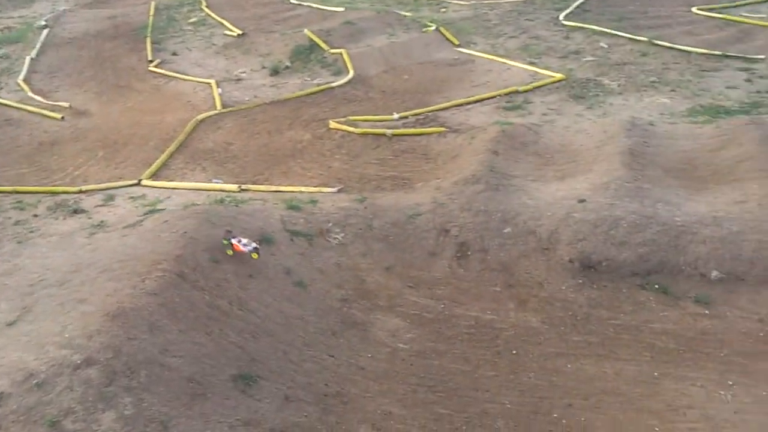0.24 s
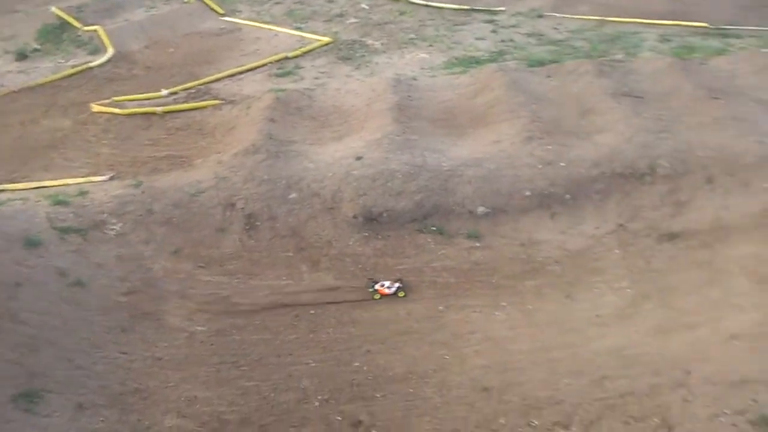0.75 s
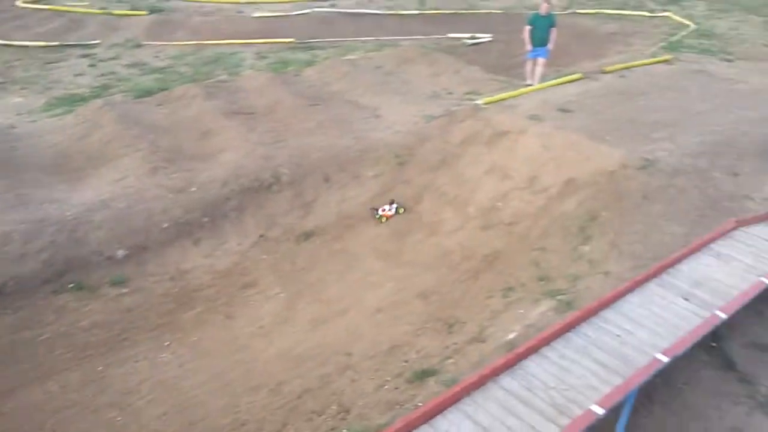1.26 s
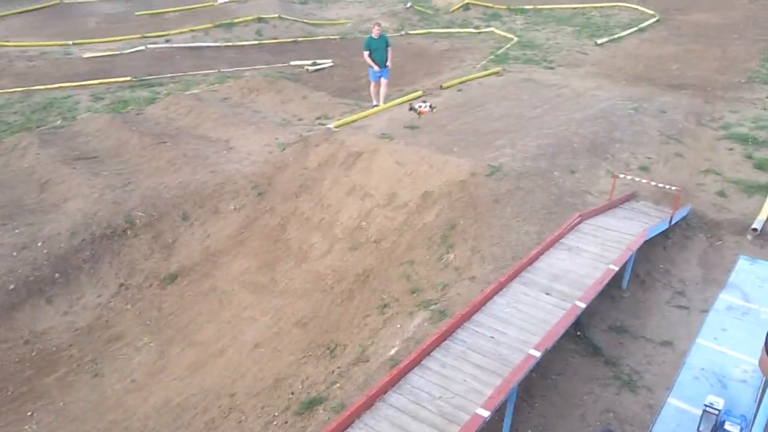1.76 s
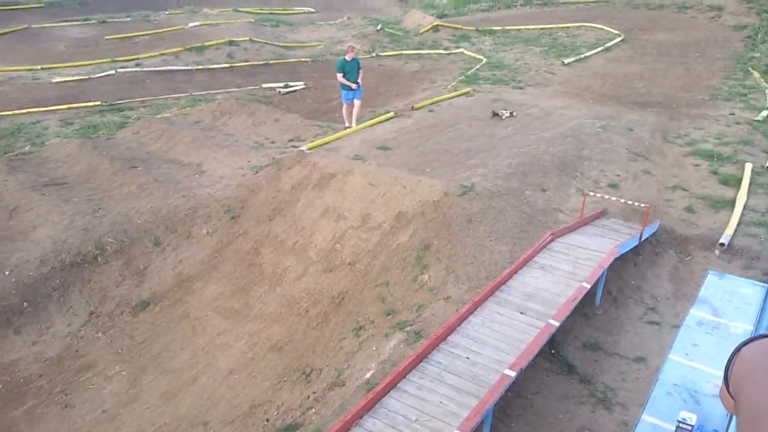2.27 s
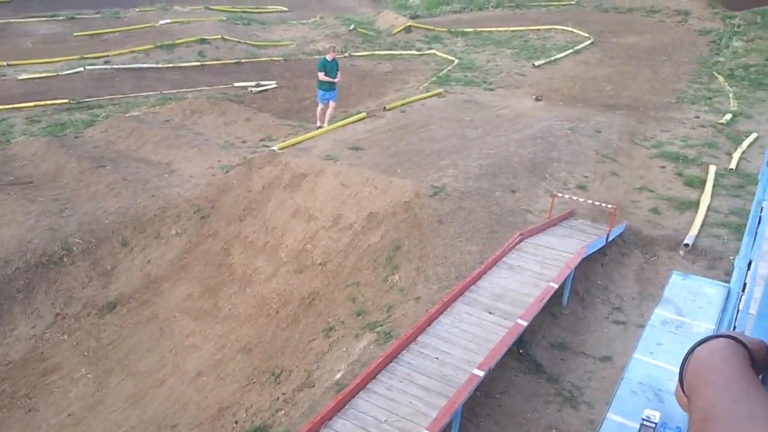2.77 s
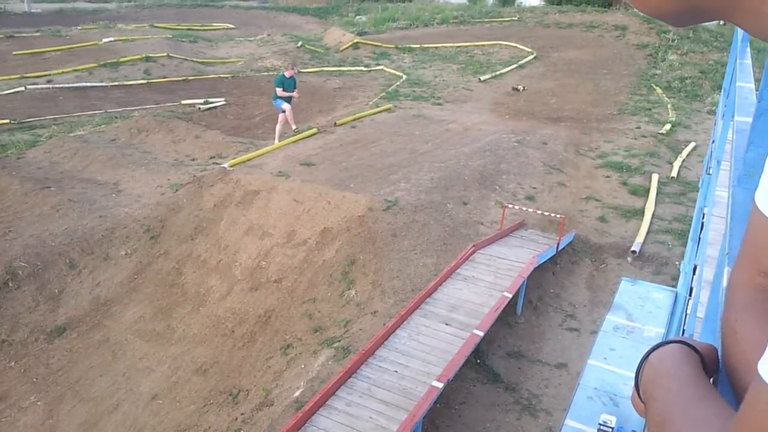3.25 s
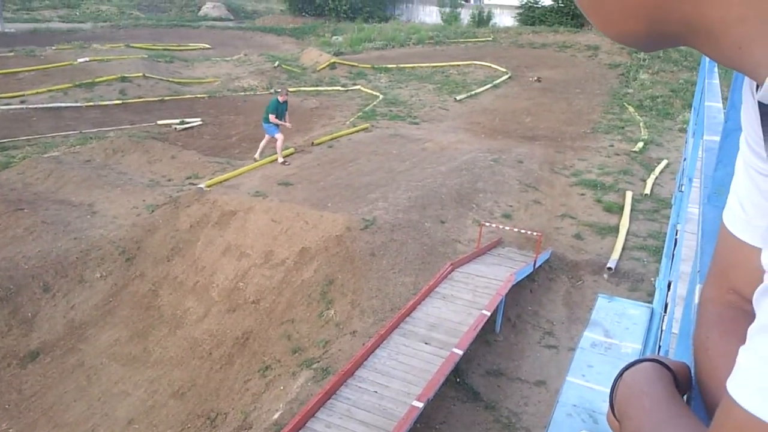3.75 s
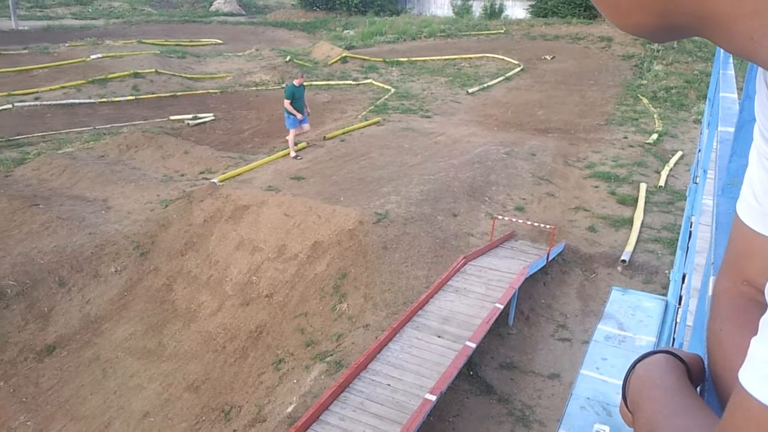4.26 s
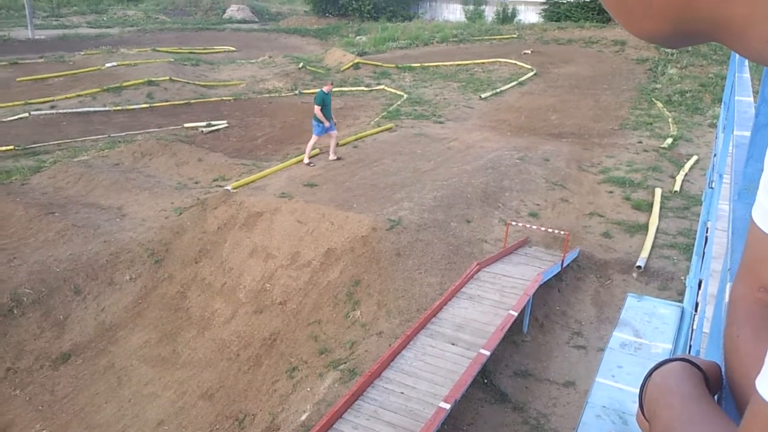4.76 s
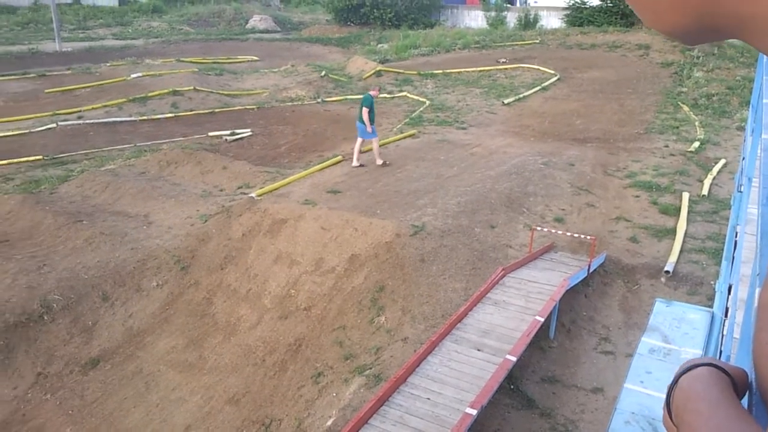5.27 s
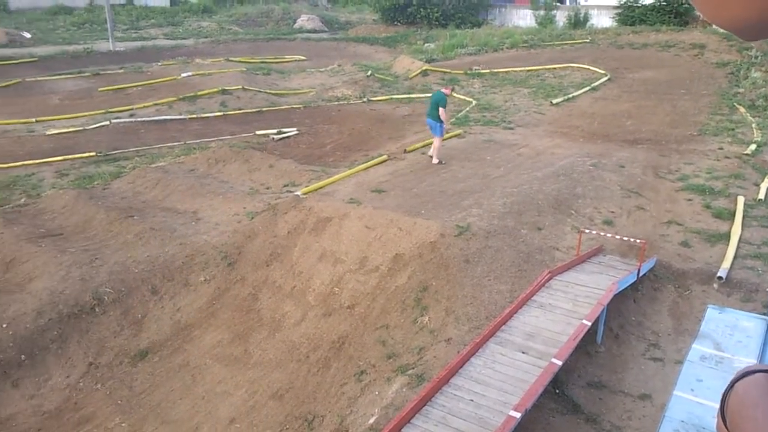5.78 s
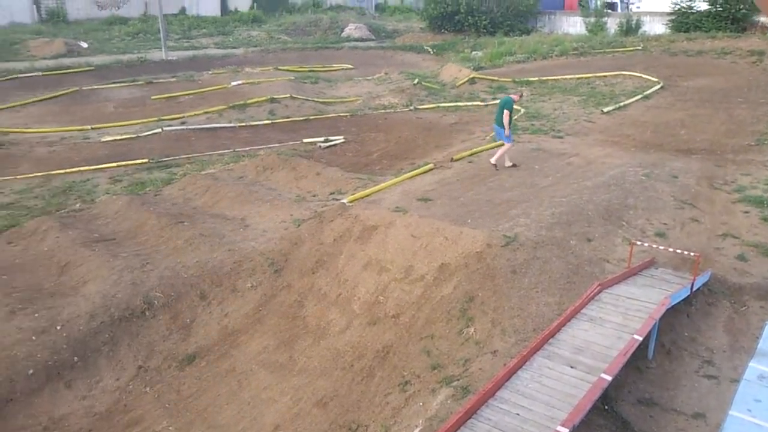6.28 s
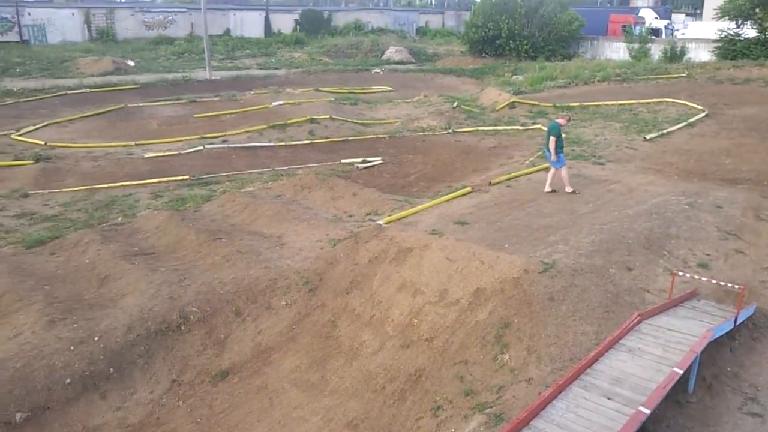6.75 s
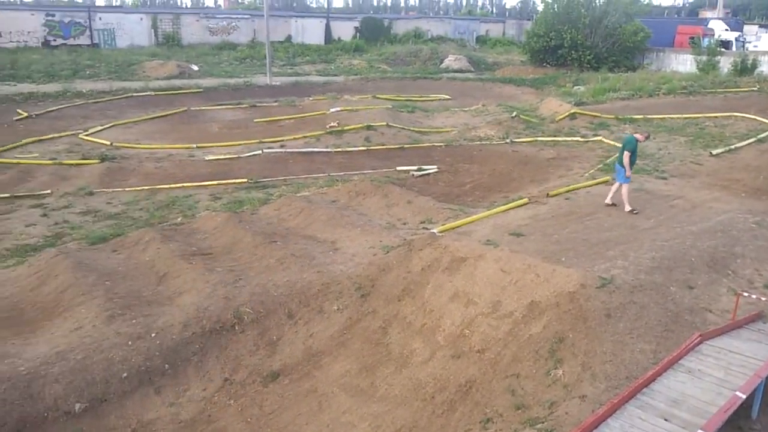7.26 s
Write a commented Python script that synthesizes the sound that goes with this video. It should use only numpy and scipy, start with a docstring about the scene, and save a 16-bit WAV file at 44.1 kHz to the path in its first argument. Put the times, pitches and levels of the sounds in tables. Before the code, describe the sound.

A small fuel-powered model buggy races around an outdoor dirt track. Its two-stroke engine screams in quick, sharp revs with a raspy buzz, a gassy hiss and brief thin whines. Midway it drops to a lower, quieter buzz, then revs up again, stumbling over bumps, with more short blips near the end. The hand-held microphone gives a bright sound with almost no echo.

```python
"""A dirt track: a tiny two-stroke buggy screams round below a hand-held camera, blipped over bumps.
Each firing barks from the tuned pipe, rasps in the crankcase and spits gas; a pure note and short
whines beam out on top, and the dirt banks scatter the engine. The two microphone ports differ:
the left whistles near 10 kHz and overloads, the right is dull and wired inverted."""
import sys
import numpy as np
from scipy import signal
from scipy.fft import rfft, irfft, next_fast_len
from scipy.io import wavfile
from scipy.ndimage import uniform_filter1d, map_coordinates

SR = 44100
rng = np.random.default_rng(int(sys.argv[2]) if len(sys.argv) > 2 else 0)


def dump_mix(stems):
    """Bounce the given channels to the path in sys.argv[1] as a 16-bit WAV at rate SR."""
    frames = np.atleast_2d(stems).T  # one column per channel
    limited = np.clip(frames, -1, 1)  # hard clip at full scale
    pcm = np.round(limited * 32767).astype(np.int16)
    wavfile.write(sys.argv[1], SR, pcm)


N = 331632
TIME_S = np.arange(N) / SR

# Grit, the turbulent share against clean firings, and unsteady revs:
# time_s, bark_share, rasp_share, waver_percent
GRIT = [(0, .08, .35, .5), (.35, .06, .22, .5), (.42, .65, .65, 2), (.6, .35, .55, 1.8), (.75, .2, .4, 1.6),
        (.93, .3, .4, 1.5), (1.02, .8, .35, 1), (1.42, .55, .5, .8), (1.6, .3, .6, 1), (1.72, .75, .3, .25),
        (2, .8, .35, .3), (2.1, .1, .22, .5), (2.24, .15, .3, .5), (2.33, .85, .85, 1), (2.47, .1, .25, 1),
        (2.7, .1, .22, .6), (2.8, .3, .38, 1.6), (3.3, .45, .55, 2), (3.45, .55, .6, 1.3),
        (3.6, .9, .9, .5), (4.9, .85, .85, .8), (5.15, .7, .42, 1.4), (6.1, .8, .55, 1.5),
        (6.25, .5, .45, .4), (6.36, .85, .3, .25), (6.6, .9, .35, .3), (6.75, .92, .7, .8),
        (7.05, .9, .75, .8), (7.12, .55, .5, 1.3), (7.28, .65, .6, 1.5), (7.4, .92, .85, 1)]
def engine():
    """Bark, rasp and hiss ride the same firings; the pure tones come apart, as they beam at the camera."""
    hz = firing_rate()
    bark_grit, rasp_grit, waver_percent = curves(GRIT)
    turns = np.cumsum(hz * (1 + waver_percent / 100 * wobble(45))) / SR
    pulses = firings(hz, turns, scatter_db=1.5, jitter_turns=.005)
    pulses = pipe_smear(pulses, s_per_hz=8e-7)
    bark = pipe_bark(pulses, turns, bark_grit)
    rasp = crankcase_rasp(pulses, turns, rasp_grit)
    hiss = gas_hiss(pulses, turns)
    bark_db, rasp_db, hiss_db = faders()
    # the chassis bounces and swings each outlet about
    body = (amp(bark_db + 1.1 * wobble(25)) * bark
            + amp(rasp_db + .76 * wobble(25)) * rasp
            + amp(hiss_db + .24 * wobble(18) + .97 * wobble(40)) * hiss)
    note = firing_note(turns)
    low_cut_hz = hz * (.92 - .38 * bark_grit)  # the cut sits lower when the bark is gritty
    return moving_eq(body, low_cut_hz), note + whines(turns)


# Moves of the throttle finger: start_s, target_hz, lag_s
THROTTLE_MOVES = [(.015, 575.3, .075), (.17, 509.7, .15), (.385, 431.4, .012), (.44, 375, 0.016),
                  (.52, 434, 0.063), (.64, 558.7, .1), (.75, 498, 0.026), (.94, 340.2, 0.029),
                  (1.05, 268.3, .25), (1.44, 699, 0.23), (1.62, 462.8, .012), (1.66, 255, .25),
                  (2.025, 679.5, .12), (2.2, 597, .015), (2.256, 225.4, 0.049), (2.45, 369.6, .02),
                  (2.54, 589, 0.075), (2.75, 456.6, 0.016), (2.82, 525.6, 0.049), (3.515, 221.7, .1),
                  (4, 332.1, 0.37), (4.17, 351.6, 0.019), (4.39, 230.4, .039), (4.59, 300.5, .04),
                  (4.72, 285.7, 0.052), (5.03, 394.8, .025), (5.2, 473, 0.063), (5.99, 382, 0.011),
                  (6.155, 562.5, 0.042), (6.27, 120.4, .5), (6.65, 238.1, 0.029), (7.08, 403.5, 0.014),
                  (7.19, 450.7, .02), (7.292, 235, 0.054)]
# Wheels dig in and drag the revs down, or lift off and race (negative drop): centre_s, drop_hz
WHEEL_BUMPS = [(.833, 60), (2.967, 105), (3.13, 70), (3.2, 50), (3.275, 62), (3.345, 62), (3.42, -18),
               (3.47, 25.5), (5.408, 55), (5.582, 50), (5.7, -50.5), (5.8, 65), (7.165, 30), (7.254, 46.5)]
def firing_rate(start_hz=268.4, bump_s=.04):
    """Firings a second: the engine chases each throttle setting and stumbles on bumps."""
    hz = np.full(N, start_hz)
    for start_s, target_hz, lag_s in THROTTLE_MOVES:
        a = round(start_s * SR)
        hz[a:] = target_hz + (hz[a] - target_hz) * np.exp(-(TIME_S[a:] - TIME_S[a]) / lag_s)
    return uniform_filter1d(hz, size=600) - bells(WHEEL_BUMPS, bump_s)


def firings(hz, turns, scatter_db, jitter_turns):
    """One sharp pulse a turn, uneven in size and timing."""
    at = np.interp(np.arange(1, turns[-1]), turns, np.arange(N))
    luck = rng.standard_normal((len(at), 2))
    period = SR / hz[at.astype(int)]
    at = np.clip(at + jitter_turns * period * luck[:, 0], 8, N - 9)
    grid = at.astype(int)[:, None] + np.arange(-7, 9)
    offset = grid - at[:, None]
    click = np.sinc(offset) * np.cos(np.pi * offset / 16) ** 2  # lands between samples
    size = amp(scatter_db * luck[:, 1]) * np.sqrt(period)
    return unit(np.bincount(grid.ravel(), (click * size[:, None]).ravel(), N))


def pipe_smear(x, s_per_hz):
    """The pipe's chambers let higher frequencies out later, so a firing is no single click."""
    hz = np.fft.rfftfreq(N, 1 / SR)
    return irfft(rfft(x) * np.exp(-1j * np.pi * s_per_hz * hz ** 2), N)


def puffs(turns, depth):
    """Turbulence that swells once a turn, as the exhaust port opens."""
    return unit(np.exp(depth * np.cos(2 * np.pi * turns)) * rng.standard_normal(N))


# Ring of the tuned pipe: frequency_hz, gain_db
PIPE_RING_EQ = [(150, -30), (330, -26), (570, -19), (790, -4), (930, -4), (1140, -11), (1430, -2),
                (1850, -11), (2350, -3), (2900, -8), (5000, -35)]
# Colour of the pipe's turbulence: frequency_hz, gain_db
PIPE_WASH_EQ = [(150, -11.5), (500, -9), (900, -6), (2300, -5.5), (3200, -29.5)]
def pipe_bark(pulses, turns, grit):
    """Clean firings ring the pipe, and turbulence roughens the bark."""
    ring = unit(coloured(pulses, PIPE_RING_EQ))
    wash = unit(coloured(puffs(turns, depth=.67), PIPE_WASH_EQ))
    return unit(blend(ring, wash, grit))


# Bite of the crankcase: frequency_hz, gain_db
CRANKCASE_EQ = [(1200, -42), (2000, -2), (2800, -2), (3500, 2.5), (4100, 3), (4700, 4), (5400, -2),
                (6000, -5), (8000, -5.5)]
def crankcase_rasp(pulses, turns, grit):
    """Firings and near-steady turbulence buzz through the crankcase."""
    return unit(coloured(blend(pulses, puffs(turns, depth=.027), grit), CRANKCASE_EQ))


# Sizzle of the escaping gas: frequency_hz, gain_db
GAS_EQ = [(3000, -72), (6000, -11), (7300, -5.5), (8600, 1), (10000, 1.5), (12000, -2.5), (15000, -3)]
def gas_hiss(pulses, turns):
    """Gas spits out once a turn, almost all turbulence."""
    return unit(coloured(blend(pulses, puffs(turns, depth=.99), share=.99), GAS_EQ))


# Slow level rides as the buggy moves and turns: time_s, bark_db, rasp_db, hiss_db
LEVEL_RIDES = [(0, -27.5, -15, -43), (.17, -31, -19.5, -18), (.43, -26.5, -14.5, -24),
               (.6, -35.5, -21.5, -20.5), (1, -31, -20.5, -25), (1.6, -33.5, -20, -21.5),
               (2, -30, -16.5, -30), (2.6, -25.5, -22.5, -19), (3.41, -23.5, -17.5, -20),
               (3.95, -33, -30, -37), (4.6, -31.5, -27, -32.5), (4.9, -29.5, -27, -24.5),
               (5.3, -29.5, -26, -20), (6.1, -29.5, -22, -20.5), (6.35, -29, -16, -22.5),
               (6.6, -27.5, -18, -50), (6.8, -30.5, -21.5, -39), (7.05, -29, -22.5, -21.5),
               (7.25, -35.5, -25.5, -20.5), (7.52, -26, -24, -35)]
# Exhaust bursts, mostly as the throttle snaps open: peak_s, hold_s, bark_db, rasp_db, hiss_db
EXHAUST_BURSTS = [(0.06, 0.0051, 5.5, 8, 22.5), (0.389, 0.087, -3, -0.5, 2), (.79, 0.012, 5.5, 2, 0.5),
                  (1.06, 0.0066, 1, 5, -3), (1.2, 0.01, 3, 3, 2), (1.461, 0.028, 7.5, 5.5, 7),
                  (2.054, 0.004, 7, 6, 15), (2.19, 0.0083, -3, -0.5, 12.5), (2.49, 0.0034, 3, 5, 9.5),
                  (4.05, 0.031, 3, 6, -13), (4.208, 0.16, 3.5, 6, 13), (5.085, 0.013, 0.5, 4, 6.5),
                  (5.87, 0.0091, 0, -0.5, 1), (6.22, 0.023, 3.5, 0, 4), (6.69, 0.011, 1.5, 0, 11),
                  (7.105, 0.054, 1.5, 5.5, 6.5), (7.489, 0.01, -4.5, -2, 8.5)]
# Brief ducks in level: centre_s, depth_db
DUCKS = [(.99, 4.5), (2.11, -0.5), (2.641, 4.5), (6.279, 5), (7.308, 6.5)]
def faders(rise_s=.038, fall_s=.054, duck_s=.017):
    """Bark, rasp and hiss in dB: slow rides with bursts and ducks on top."""
    db = np.array(curves(LEVEL_RIDES))
    for peak_s, hold_s, *boost_db in EXHAUST_BURSTS:
        before = np.clip(peak_s - TIME_S, 0, None) / rise_s
        after = np.clip(TIME_S - peak_s - hold_s, 0, None) / fall_s
        db += np.outer(boost_db, np.exp(-before ** 2 - after ** 2))
    return db - bells(DUCKS, duck_s)


# Bands that glint or fade as the buggy turns: centre_s, length_s, centre_hz, width_hz, gain_db
GLINT_BANDS = [(0.2, 0.37, 915, 446, 5), (0.298, 0.7, 3520, 189, 6), (.3, 0.17, 4560, 187, 8),
               (.5, 1.6, 13400, 1500, 4.5), (0.842, 0.36, 2050, 190, 9), (0.946, 0.055, 4260, 349.7, 12.5),
               (1.101, 1.8, 10450, 129.9, 11), (1.38, 0.12, 3500, 150, 8), (1.805, 0.43, 3450, 220, 8.5),
               (2.476, 0.13, 2430, 400, 7), (3.198, 0.31, 895, 129.7, 6.5), (3.847, 0.41, 5350, 299.4, 11),
               (4.229, .12, 5610, 400, 11), (4.286, 0.23, 9655, 399.8, 7), (4.65, 0.64, 5522, 300.1, 10.5),
               (4.94, 0.39, 8600, 191.3, 16), (5.142, 0.4, 4230, 793.4, 6), (5.599, 1.1, 11100, 500.4, 6),
               (6.17, 0.15, 2600, 401.3, 9.5), (6.702, 1.2, 13750, 1530, -9.5),
               (6.86, 0.45, 3880, 250.5, 9.5), (6.918, 0.36, 10040, 200.1, 6),
               (7.097, 0.087, 2280, 700, 6.5)]
def moving_eq(x, low_cut_hz, steepness=12, patchy_db=1.39):
    """The engine's sound with a low cut that follows the firing rate, uneven patches and passing glints."""
    hz, t, spectrum = signal.stft(x, SR, nperseg=1024)
    hz = hz[:, None]
    patches = uniform_filter1d(rng.standard_normal(spectrum.shape), size=8, axis=0)
    db = patchy_db * unit(uniform_filter1d(patches, size=4, axis=1))
    for centre_s, length_s, centre_hz, width_hz, gain_db in GLINT_BANDS:
        band = np.exp(-((hz - centre_hz) / width_hz) ** 2)
        db += gain_db * band * soft_gate(t, centre_s, length_s)
    ratio = hz / np.interp(t, TIME_S, low_cut_hz)
    low_cut = 1 / (1 + (ratio + 1e-3) ** -steepness)
    return signal.istft(spectrum * amp(db) * low_cut, SR, nperseg=1024)[1][:N]


# Level ride of the engine's fundamental: time_s, level_db
NOTE_RIDE = [(0, -40), (.14, -38), (.9, -35.5), (1.1, -40.5), (1.4, -42), (1.6, -36), (1.8, -62),
             (2.2, -21.5), (2.35, -49), (2.68, -29), (2.85, -48), (3.5, -49), (3.75, -44), (4.1, -40.5),
             (4.3, -25.5), (4.5, -40), (4.9, -35), (6.25, -33), (6.6, -57), (7.52, -47)]
def firing_note(turns):
    """A pure note at the firing rate, fluttering in level and phase."""
    level_db = curves(NOTE_RIDE)[0] + 2.5 * wobble(40)
    return amp(level_db) * np.sin(2 * np.pi * turns + .4 * wobble(70))


# Overtones that cut through: centre_s, length_s, harmonic_number, level_db
WHINE_CUES = [(.28, .3, 7, -23), (.76, .16, 4, -27), (1.72, .07, 8, -21), (1.81, .08, 9, -21),
              (1.81, .06, 11, -20), (2.19, .14, 7, -23), (2.86, .2, 5, -28), (3.455, .19, 9, -18),
              (6.32, .26, 9, -22), (6.55, .26, 11, -25)]
def whines(turns):
    """Single multiples of the firing rate sing out briefly, with a flutter."""
    tones = sum(amp(db) * soft_gate(TIME_S, centre_s, length_s) * np.sin(2 * np.pi * harmonic * turns)
                for centre_s, length_s, harmonic, db in WHINE_CUES)
    return tones * amp(2.5 * wobble(40))


def dirt_banks(x, t60_s, renewals, predelay_samples=60):
    """Scattered echoes off the banks, different at each port and renewed as the buggy moves on."""
    t, out = np.arange(SR // 8) / SR, np.zeros((2, N + SR))
    hop = N // renewals + 1
    for start in range(-hop, N, hop):
        a = max(start, 0)
        piece = x[a:start + 2 * hop]
        piece = piece * np.hanning(2 * hop)[a - start:][:len(piece)]
        tail = rng.standard_normal((2, len(t))) * amp(-60 * t / t60_s)
        echo = signal.fftconvolve(piece[None], tail / np.linalg.norm(tail[0]), axes=1)
        out[:, a + predelay_samples:][:, :echo.shape[1]] += echo
    return out[:, :N]


def amp(db):
    """Gain of a level."""
    return 10 ** (np.asarray(db) / 20)


def unit(x):
    """Scaled to rms 1."""
    return x / np.sqrt(np.mean(x ** 2) + 1e-20)


def blend(clean, rough, share):
    """Equal-power crossfade."""
    return np.sqrt(1 - share) * clean + np.sqrt(share) * rough


def curves(rows):
    """One automation lane for each column after the time."""
    time_s, *columns = np.transpose(rows)
    return [np.interp(TIME_S, time_s, column) for column in columns]


def bells(rows, width_s):
    """A lane with a bell-shaped swell at each cue."""
    return sum(height * np.exp(-((TIME_S - centre_s) / width_s) ** 2) for centre_s, height in rows)


def soft_gate(t, centre_s, length_s):
    """A flat-topped fade in and out."""
    return np.exp(-(2 * (t - centre_s) / length_s) ** 4)


def wobble(rate):
    """A smooth random curve, rate knots a second."""
    return map_coordinates(rng.standard_normal(int(N * rate / SR) + 4), [TIME_S * rate])


def coloured(x, eq, size=4096):
    """x through a minimum-phase EQ drawn as frequency_hz, gain_db points."""
    hz, db = np.transpose(eq)
    gain = amp(np.interp(np.log(np.fft.rfftfreq(size, 1 / SR) + 1), np.log(hz), db))
    cepstrum = irfft(np.log(gain))
    cepstrum[1:size // 2] *= 2
    cepstrum[size // 2 + 1:] = 0
    return signal.fftconvolve(x, irfft(np.exp(rfft(cepstrum))))[:N]


def delayed(x, ms):
    """x later by a changing time."""
    return map_coordinates(x, [np.arange(N) - ms * SR / 1000], order=5, mode="nearest")


# The buggy's bearing, heard as a gap between the ports: time_s, right_lead_ms
PAN_PATH = [(0, 0.14), (.9, 0.00099), (1.4, 0.023), (2.5, -0.11), (3.2, -0.066), (5.6, -0.086),
            (7, -0.00065), (7.52, 0.068)]
def scene():
    """Direct and scattered sound at two ports; the right thins as it leads and fills out as it trails."""
    lead_ms, = curves(PAN_PATH)
    body, tones = engine()
    buggy = body + tones
    lows = coloured(buggy, [(1500, -5), (3500, -53)])
    right = delayed(buggy + (amp(-25 * lead_ms) - 1) * lows, -lead_ms)
    echo_send = coloured(body, [(800, -4), (3000, 0), (9000, 3)])
    return np.array([buggy, right]) + dirt_banks(echo_send, t60_s=.04, renewals=60)


# The whistling left port: frequency_hz, gain_db
LEFT_PORT_EQ = [(100, 9.5), (300, 4.5), (900, 6), (3000, 2), (4700, -4.5), (7000, 0), (9300, 1),
                (10400, 10.5), (11500, 2.5), (15000, -5.5)]
# The dull right port: frequency_hz, gain_db
RIGHT_PORT_EQ = [(100, -12), (300, 0), (900, 2), (5000, 1.5), (8600, -4), (9500, -12), (10400, -8),
                 (12200, -23), (13500, -15), (15000, -18)]
def record(dry, ceiling=.98, low_cut_hz=130, top_hz=14600):
    """Port resonances, inverted right side, overload, low cut, band limit."""
    ports = np.array([coloured(dry[0], LEFT_PORT_EQ), -coloured(dry[1], RIGHT_PORT_EQ)])
    clipped = ports / (1 + np.abs(ports / ceiling) ** 16) ** (1 / 16)
    size = next_fast_len(N + 8192)
    hz = np.fft.rfftfreq(size, 1 / SR)
    passband = (hz < top_hz) * hz ** 2 / (hz ** 2 + low_cut_hz ** 2)
    return irfft(rfft(clipped, size) * passband, size)[:, :N]


dry = scene()
out = record(dry)
dump_mix(out)
```